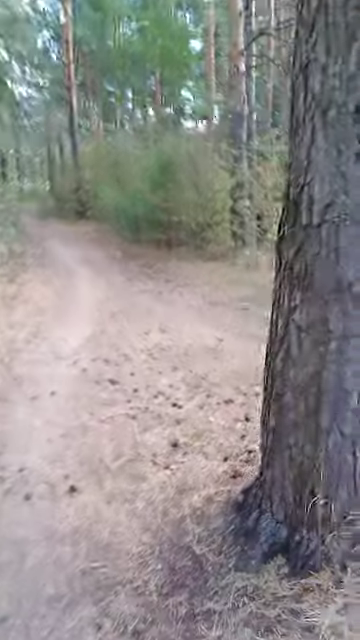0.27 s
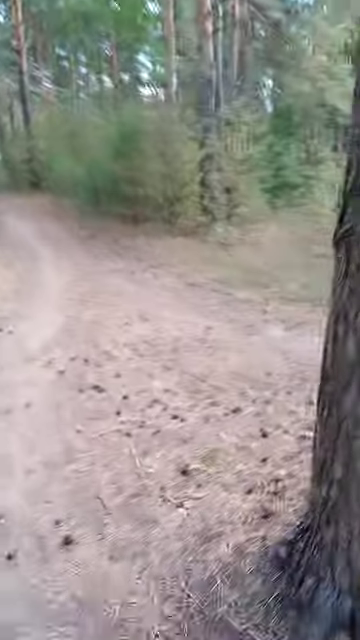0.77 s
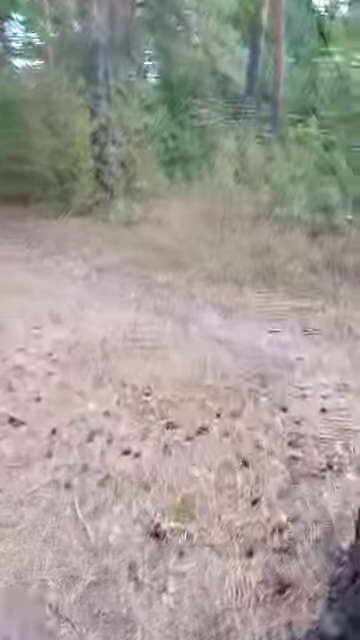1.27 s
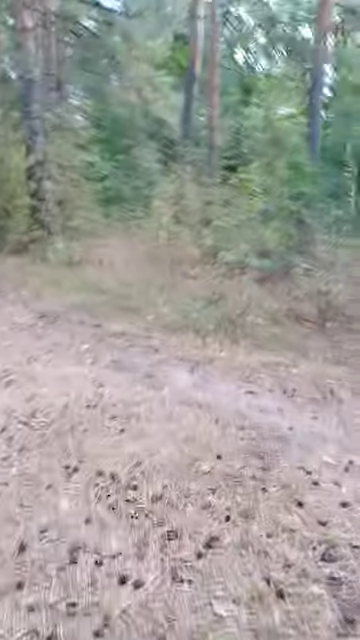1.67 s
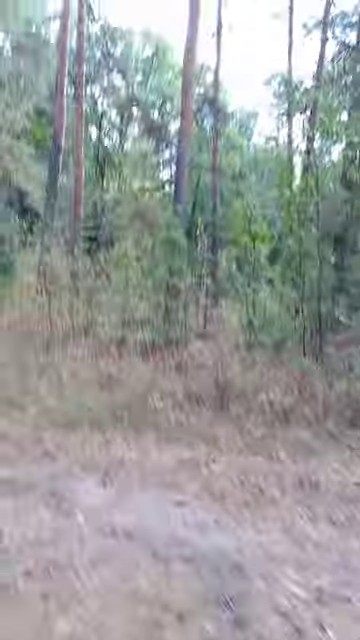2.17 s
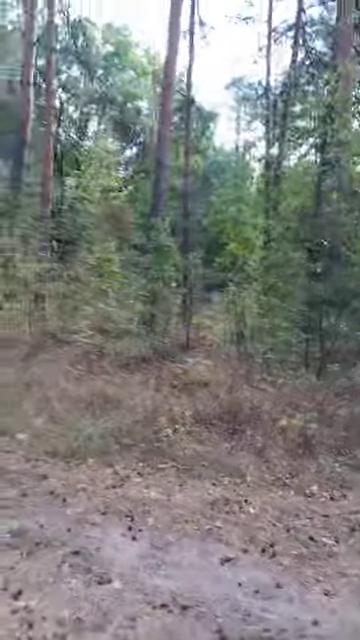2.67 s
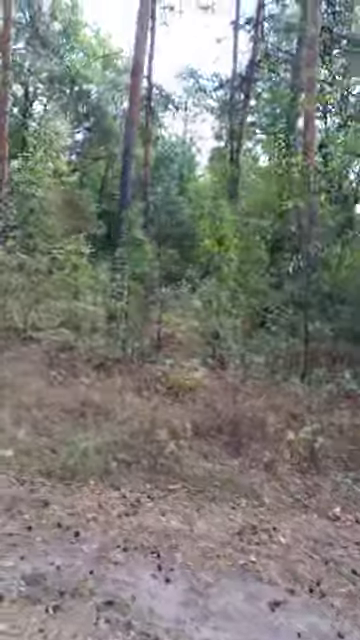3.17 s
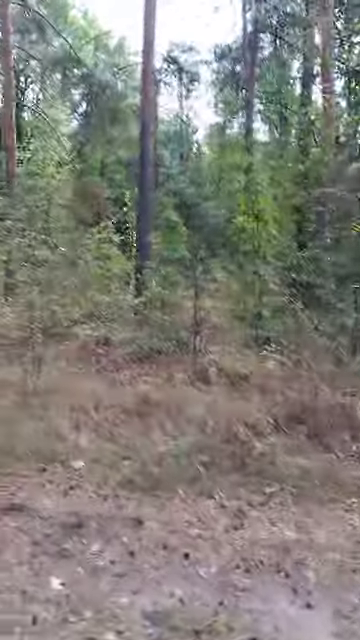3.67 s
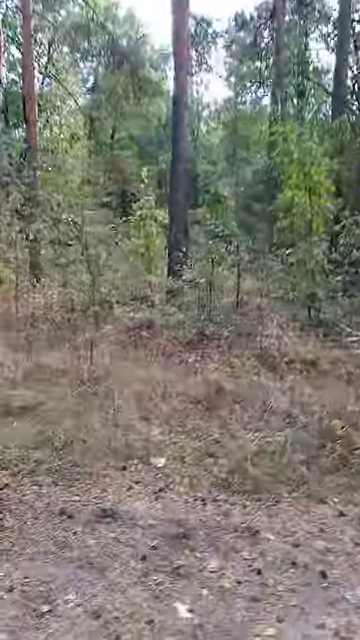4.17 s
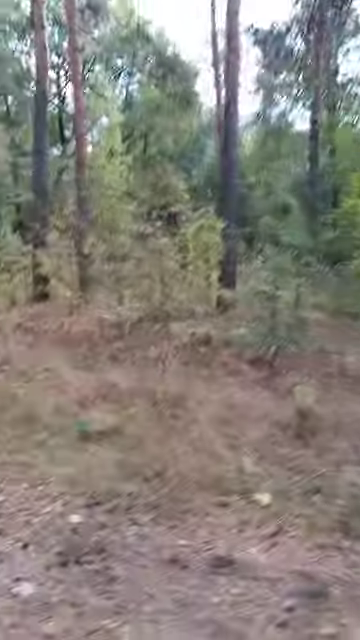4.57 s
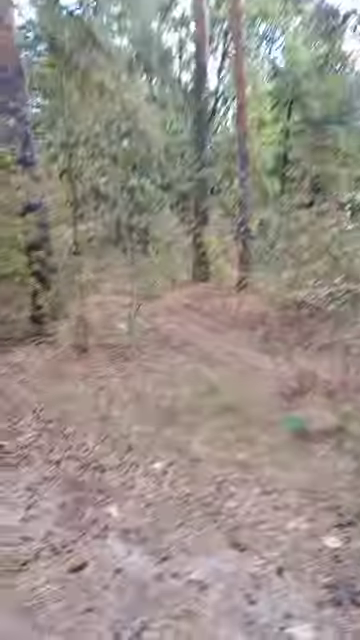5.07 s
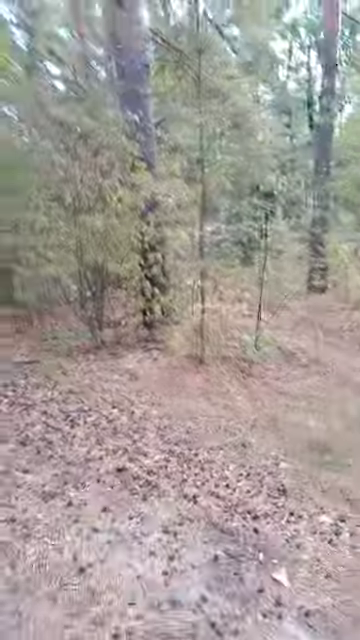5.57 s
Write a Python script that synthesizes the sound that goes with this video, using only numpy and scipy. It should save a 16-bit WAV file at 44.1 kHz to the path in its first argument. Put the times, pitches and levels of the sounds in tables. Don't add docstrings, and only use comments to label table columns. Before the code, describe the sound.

Silence until about 0.4 s, when the sound wakes with a tiny low bump. A bicycle rolls quietly along a dry forest trail: soft needle hiss, grainy crunch, low rumble and a wavering tread hum, under buffeting low wind differing left and right. Fingertip handling is far louder: small clicks from 0.44 s, then hard left-sided pops at 0.75-0.8 s. Light twig crunches come at 1.4-1.6 s, with faint regular ticking from 1.3 to 2.8 s. A thump seals the left port at 1.9 s; stronger, clipped thumps follow at 2.55 and 3.4 s, with pops around 2.59, 3.68, 4.26, 4.45, 4.57 and 4.7 s, and hollow housing knocks. Small bumps occur near 2.63 and 3.3 s. The treble cuts out briefly in lulls. A jolt and crackling cones arrive at 4.87-5.05 s, then the brightest, densest snaps at 5.45-5.8 s.

```python
import sys
import numpy as np
from scipy import signal
from scipy.io import wavfile

SR = 44100
rng = np.random.default_rng(int(sys.argv[2]) if len(sys.argv) > 2 else 0)


def amplitude_ratio(level_db):
    exponent = np.asarray(level_db, float) / 20
    return 10 ** exponent


def unload_wav(signal):
    wavfile.write(
        sys.argv[1],
        SR,
        np.round(np.clip(np.atleast_2d(signal).T, -1, 1) * 32767).astype(np.int16),
    )


N = 256662
T = np.arange(N) / SR
START_S = .3803
CUTOFF_HZ = 16550


def rms_one(x):
    return x / np.sqrt(np.mean(x ** 2) + 1e-20)


def in_time(rows):
    s, *columns = np.transpose(rows)
    return [np.interp(T, s, c) for c in columns]


def at_hz(points, hz):
    points = np.array(points)
    return np.array([np.interp(np.log(hz), np.log(points[:, 0]), c) for c in points[:, 1:].T])


def drift(rate):
    r = np.exp(-80 * np.pi * rate / SR)
    slow = signal.lfilter([1], [1, -2 * r, r * r], rng.standard_normal(N // 40 + 2002))[2000:]
    return np.interp(np.arange(N) / 40, np.arange(len(slow)), rms_one(slow))


def butter(x, hz, kind, order=2):
    return signal.sosfilt(signal.butter(order, hz, kind, fs=SR, output="sos"), x)


def ring(clicks, hz, t60):
    r, w = amplitude_ratio(-60 / (t60 * SR)), 2 * np.pi * hz / SR
    return signal.lfilter([0, np.sin(w)], [1, -2 * r * np.cos(w), r * r], clicks + 1e-18)


def opening():
    age = np.clip(T - START_S, 0, None)
    stairs = 1 - np.exp(-np.ceil(age / .01) * .35)
    offset = 0.02 * stairs + 0.0024 * (1 - np.exp(-age / 0.014))
    return offset * np.exp(-(age / 0.12) ** 4) * [[1], [.8]]


# time in seconds, gust level in dB, left over right in dB.
WIND = [(.4, -61, 10), (.55, -46, 3), (.75, -40.5, 14), (.95, -40.5, -3.5), (1.25, -36.5, -1.5),
        (1.45, -51, 8.5), (1.7, -43, 4.5), (2.25, -42, -7.5), (2.5, -44, 7.5), (2.85, -41, 2.5),
        (3.2, -47.5, -1.5), (3.36, -42.5, 13.5), (3.88, -41.5, -7), (4.2, -47, -11.5), (4.5, -39, 5),
        (4.75, -43, -5.5), (5.3, -38, -6), (5.8, -41, -17)]
DUCK_DB, DUCK_AFTER_S, DUCK_S = -12.5, 0.054, 0.09


def wind():
    gust_db, lean_db = in_time(WIND)
    for s, *_ in SEALS:
        gust_db = gust_db + DUCK_DB * np.exp(-((T - s - DUCK_AFTER_S) / DUCK_S) ** 2)
    out = []
    for level_db in (gust_db + lean_db / 2, gust_db - lean_db / 2):
        eddies = butter(rng.standard_normal(N), 5.06, "low", order=1)
        eddies = butter(butter(eddies, 65, "low"), 5.77, "high")
        lumps_db = 2.44 * drift(11)
        out.append(amplitude_ratio(level_db + 0.5 + lumps_db) * rms_one(eddies))
    return np.array(out)


# time in seconds, peak in dB.
KNOCKS = [(0.7558, -36), (0.7971, -35), (1.9042, -45), (2.2561, -55.5), (2.5552, -25.5), (2.5853, -29),
          (3.4036, -35.0), (3.684, -30), (4.2641, -42.5), (4.435, -38.5), (4.4589, -39), (4.5715, -32.5),
          (4.6934, -34)]
# time in seconds, peak in dB.
BUMPS = [
    (.598, -57),
    (2.634, -47),
    (2.645, -63),
    (2.77, -53.5),
    (3.299, -47.5),
    (4.87, -46),
    (4.952, -41.5),
]
# frequency in Hz, level in dB, t60 in seconds.
CASE = [(375.7, 1.5, 0.028), (520, -2, 0.021), (178, -16.5, 0.085)]


def knocks():
    clicks = np.zeros(N)
    for s, peak_db in [*KNOCKS, *BUMPS]:
        clicks[round(s * SR)] = amplitude_ratio(peak_db)
    modes = sum(amplitude_ratio(level_db) * ring(clicks, hz, t60) for hz, level_db, t60 in CASE)
    return butter(modes, 750, "low") * [[1.6], [1]]


# start in seconds, pressure step (full scale 1),
# settling frequency in Hz, closing time in ms.
SEALS = [
    (1.9039, -0.7, 3.55, 2.2),
    (2.5542, 1.1, 3.68, .9),
    (3.4033, 1.3, 3.7, 1.1),
]


def seals():
    out = np.zeros((2, N))
    for s, step, hz, closing in SEALS:
        age = np.clip(T - s, 0, None)
        rise = np.sin(np.pi / 2 * np.clip(age * 1000 / closing, 0, 1)) ** 2
        wobble = 1 - 0.072 * np.cos(2 * np.pi * 290 * age) * np.exp(-age / .006)
        phase = 2 * np.pi * hz * age
        leak = np.exp(-.75 * phase) * (np.cos(0.35 * phase) - 1.95 * np.sin(0.5 * phase))
        out[0] += step * rise * wobble * leak
    return out


# time in seconds, suction in dB, rebound in dB,
# pull in ms (negative: a push), crackle in dB.
FLICKS = [(0.4413, -30, -39.5, -0.19, -65), (.6477, -23, -19.5, -0.079, -46),
          (.7535, -23, -25, 0.075, -26.5), (0.7577, -7.5, -8.5, -0.018, -10),
          (0.7987, -1.5, -31.5, 0.005, -21), (2.5544, -4.5, -12.5, 0.0091, -16.5),
          (2.58577, -2, -8, 0.078, -24), (3.4037, -15, -17, .05, -22), (3.6841, -5, -4.5, -0.15, -18),
          (4.2617, 1.5, -11.5, 0.088, -26), (4.4377, -14, -9, 0.14, -11.5), (4.4596, -8.5, -37, 0.028, -27),
          (4.5713, -4.5, -3, .12, -35.5), (4.693, -12, -38, 0.073, -31)]
# time in seconds, suction in dB, rebound in dB,
# pull in ms (negative: a push), crackle in dB.
PEELS = [(0.4391, -37.5, -60, -0.99, -70), (.538, -33, -57, 0.2, -60), (.9454, -29, -34, 0.34, -67),
         (1.9034, -18.5, -25, -0.32, -4), (2.2555, -23, -26, -.0052, -33.5), (2.3061, -29, -56, 0.11, -60),
         (2.586, -1, -7.5, 0.09, -16), (3.678, -39.5, -27, 0.034, -59), (3.684, 0, -11.5, 0.167, -17),
         (3.8175, -17, -24.5, -0.011, -45), (4.2351, -25.5, -52.5, 0.62, -62),
         (4.2366, -27, -26.5, 0.14, -57), (4.4376, -5.5, -6.5, 0.15, -6), (4.46, -2.5, -10.5, 0.16, -23),
         (4.57153, 4.5, -9, 0.065, -10), (4.6939, -7, -18.5, 0.3, -24.5), (4.73, -24, -40, .12, -56),
         (4.732, -13, -16, .16, -50)]
FLICK_REBOUND_MS, PEEL_REBOUND_MS = 0.062, 0.51
# frequency in Hz, width in Hz, level in dB.
PORT = [(8030, 890, 3), (2800, 1690, -0.5), (6370, 830, -3.5), (13280, 4200, 1.5)]


def pops():
    rows = [(*row, FLICK_REBOUND_MS) for row in FLICKS] + [(*row, PEEL_REBOUND_MS) for row in PEELS]
    rows = sorted(rows, key=lambda row: round(row[0], 3))
    pressure, crackle = np.zeros(N), np.zeros(N)
    noise = rng.standard_normal((len(rows), 500))
    ms = (np.arange(500) - 150) / SR * 1000
    for (s, suction_db, rebound_db, pull, crackle_db, rebound), tear in zip(rows, noise):
        at = slice(round(s * SR) - 150, round(s * SR) + 350)
        slope = np.where(ms < 0, ms / 1.4, ms / .5) / max(abs(pull), .03)
        tip = 2.5 * abs(pull)
        dip = np.exp(tip - np.sqrt(slope ** 2 + tip ** 2))
        age = np.clip((ms - .5 * abs(pull)) / max(rebound, .04), 0, None)
        swing_back = age * np.exp(1 - age)
        pressure[at] += np.sign(pull) * (amplitude_ratio(rebound_db) * swing_back - amplitude_ratio(suction_db) * dip)
        tear = tear * (abs(ms + .12 - .7 * rebound) < max(.7 * rebound, .1))
        crackle[at] += amplitude_ratio(crackle_db) * tear / np.abs(tear).max()
    crackle = sum(amplitude_ratio(level_db + 10.0) * butter(crackle, [hz - width / 2, hz + width / 2], "band", order=1)
                  for hz, width, level_db in PORT)
    pressure = pressure + 2.78 * butter(pressure, [7400, 8800], "band", order=1)
    pressure = pressure + 0.29 * butter(pressure, [1700, 3000], "band", order=1)
    left = butter(pressure, 52, "high", order=1) + crackle
    left = butter(left, 8300, "low")
    left = left - 0.65 * butter(left, [9800, 13500], "band", order=1)
    across = butter(crackle + .6 * pressure, 1500, "high")
    across = across + 3.4 * butter(across, [8000, 9800], "band", order=1)
    return np.array([left, amplitude_ratio(-36.5) * np.roll(across, 6)])


# shuts in seconds, opens in seconds, depth in dB.
GATE = [(0.815, 0.868, -20), (0.914, 0.947, -15), (1.315, 1.359, -17), (1.988, 2.009, -11),
        (2.041, 2.078, -14), (2.418, 2.543, -23.5), (2.727, 2.823, -17.5), (3.032, 3.161, -18.5),
        (3.202, 3.244, -14.5), (3.288, 3.309, -18), (3.311, 3.351, -12), (3.409, 3.426, -18),
        (3.484, 3.592, -20), (3.655, 3.671, -8), (3.687, 3.736, -32), (3.855, 3.88, -19),
        (4.165, 4.199, -17.5), (4.658, 4.698, -24), (5.262, 5.365, -23.5)]
# time in seconds, lift in dB.
BLINKS = [
    (2.472, 13.5),
    (2.49, 11),
    (2.781, 12),
    (3.094, 16),
    (3.121, 3),
    (3.539, 17),
    (3.571, 10.2),
    (5.312, 8),
]
GATE_HZ = 815


def gate():
    gain_db = -22 * np.exp(-(np.clip(T - START_S, 0, None) / 0.099) ** 2)
    for shuts, opens, depth_db in GATE:
        corners = [shuts - .004, shuts + 0.0036, opens - .008, opens + 0.0091]
        gain_db += np.interp(T, corners, [0, depth_db, depth_db, 0])
    for s, lift_db in BLINKS:
        gain_db += lift_db * np.exp(-((T - s) / 0.0085) ** 2)
    return amplitude_ratio(gain_db)


LULL_HISS, LULL_ROUGH, LULL_SPREAD_S = 0.19, 0.049, 0.063


def lulls():
    dips_db = np.zeros(N)
    for shuts, opens, depth_db in GATE:
        middle, spread = (shuts + opens) / 2, (opens - shuts) / 2 + LULL_SPREAD_S
        dips_db += depth_db * np.exp(-((T - middle) / spread) ** 2)
    return dips_db


# time in seconds, frequency in Hz, level in dB, t60 in seconds.
PINGS = [
    (.497, 6870, -49, 0.018),
    (0.503, 7130, -51, 0.012),
    (1.622, 3080, -55, 0.076),
    (1.622, 9480, -52, 0.046),
    (4.105, 2740, -60, 0.056),
    (4.999, 3000, -55, 0.024),
    (5.648, 5730, -44, .018),
    (5.728, 5600, -44, 0.026),
]


def pings():
    out = np.zeros(N)
    for s, hz, level_db, t60 in PINGS:
        taps = np.zeros(N)
        taps[round(s * SR) + np.array([0, round(6 * SR / hz)])] = .6
        out += amplitude_ratio(level_db) * ring(taps, hz, t60)
    return out * [[1.5], [1]]


def grains(per_s, spread_db):
    shape = (2, 3, N)
    sizes = amplitude_ratio(spread_db * np.minimum(rng.exponential(1, shape), 4)) * rng.choice([-1, 1], shape)
    return sizes * (rng.random(shape) < per_s / SR) + 1e-18


# frequency in Hz, shared part of the power from 0 to 1.
LIKENESS = [(100, 0.98), (200, .8), (900, 0.6), (1400, 0.8), (2500, 0.16), (4000, 0.1)]
RIGHT_LAG = 20


def coloured(white, spectrum, patchy_db, rate):
    out, together = 0, drift(rate / 2)
    lowest, highest = spectrum[0][0], spectrum[-1][0]
    edges = lowest * 2 ** np.arange(-.2, np.log2(highest / lowest) + .2, .4)
    for k, (low, high) in enumerate(zip(edges, edges[1:])):
        middle = np.sqrt(low * high)
        shared, left, right = butter(white[k % 2], [low, high], "band")
        alike = np.clip(at_hz(LIKENESS, middle)[0], 0, 1)
        common = np.array([shared, np.roll(shared, RIGHT_LAG)])
        pair = np.sqrt(alike) * common + np.sqrt(1 - alike) * np.array([left, right])
        flicker_db = patchy_db * (together + drift(rate))
        out = out + amplitude_ratio(at_hz(spectrum, middle)[:, None] + flicker_db) * pair
    return out / np.sqrt(np.mean(out[1] ** 2))


# time in seconds, needle litter in dB, roughness in dB.
GROUND = [(.38, -65.5, -68), (.65, -61, -58.5), (.95, -69, -58), (1.22, -58, -60), (1.45, -66, -60),
          (1.65, -63, -56.5), (2.05, -70.5, -56), (2.25, -62, -57), (2.65, -62.5, -62), (3.0, -68, -58),
          (3.3, -64.5, -60.5), (3.8, -65.5, -56), (4.1, -63.5, -60.5), (4.45, -62, -55.5),
          (4.7, -63.5, -54), (5.0, -65, -48), (5.3, -61.5, -57), (5.6, -62, -50.5)]
# start in seconds, peak in dB, thud relative to it in dB, length in seconds.
CRUSH = [(0.493, -77, -17, 0.0044), (0.589, -52.5, 8, 0.0062), (1.417, -49, -10, 0.0083),
         (1.518, -44, -8, 0.0098), (1.584, -55, 13, 0.0054), (1.617, -44.5, -3.5, 0.019),
         (2.632, -55.5, 23, 0.008), (2.773, -63.5, 15.5, 0.012), (3.302, -42.5, 0.5, 0.0066),
         (4.077, -45.5, -5, 0.018), (4.183, -60, 21, 0.016), (4.286, -46, -20, 0.005),
         (4.6065, -46, 9.5, 0.0092), (4.862, -45, -4, 0.0048), (4.873, -51, 9, 0.005),
         (4.893, -52, 8, 0.0077), (4.949, -35.5, -10, 0.0052), (4.974, -35, -17, 0.0054),
         (4.987, -41.5, 3, 0.011), (5.014, -47.5, -2, .007), (5.039, -49.5, -1, 0.011),
         (5.14, -57, 3, 0.0027), (5.223, -61.5, 21, 0.0073), (5.445, -39, -6, 0.0042),
         (5.571, -39, -33, 0.012), (5.6046, -29, 2, 0.0054), (5.632, -35, 7.5, 0.0085),
         (5.6627, -32.5, -28, 0.0043), (5.7223, -37, 5, 0.003), (5.78, -46, -11, 0.0045)]
# time in seconds, level in dB.
DRONE = [(.38, -72), (.85, -70), (1.1, -60), (1.5, -63.5), (2.1, -53), (2.6, -54), (2.85, -61.5),
         (3.1, -55), (3.7, -56.5), (4.35, -53), (5.05, -71), (5.6, -53)]
# first tick in seconds, last in seconds, period in seconds, lift of the hiss in dB.
TICKING = (1.3, 2.8, 0.052, 6.1)
# frequency in Hz, left in dB per Hz, right in dB per Hz.
HISS = [(501, 3, -5.5), (925, -1, -5), (1730, 2.5, -4.5), (3000, 6, -3), (4500, 0, -3.5), (6570, 0.5, -8),
        (7700, 1.5, -5), (9300, -2.5, -6), (9720, -20.5, -12.5), (12500, -15.5, -23), (16300, -8, -20.5)]
# frequency in Hz, left in dB per Hz, right in dB per Hz.
CRUNCH = [(599, -0.5, -1.5), (1320, 1, -2.5), (1870, 4, 2.5), (2140, 2, -1), (3250, 2, 0), (4800, -12, -9),
          (6450, 4, -5), (7200, -4.5, -20.5), (10900, -40, -19.5)]
# frequency in Hz, left in dB per Hz, right in dB per Hz.
RUMBLE = [(91.8, 3, 7.5), (142.5, 3, 0.5), (250, 4, 3.5), (407, 3.5, 0.5), (720, -10, -8), (930, -7.5, -16),
          (2000, -26, -35.5), (8600, -35, -38.5), (12000, -45.5, -57.5)]
CRUNCH_DB, CRUNCH_PER_LITTER = -12.5, -0.33


def tyres():
    litter_db, rough_db = in_time(GROUND)
    lull_db = lulls()
    hiss_db = litter_db + LULL_HISS * lull_db
    rough_db = rough_db + LULL_ROUGH * lull_db
    cushion_db = CRUNCH_PER_LITTER * (litter_db - litter_db.mean())
    crunch_gain = amplitude_ratio(rough_db + CRUNCH_DB + cushion_db)
    rumble_gain = amplitude_ratio(rough_db - 3.5)
    for s, peak_db, thud_db, length in CRUSH:
        at = slice(int(s * SR), int((s + .2) * SR))
        age = np.clip((T[at] - s) / max(length, .002), 0, None)
        swell = age * np.exp(1 - age)
        crunch_gain[at] += amplitude_ratio(peak_db - 10.5) * swell
        rumble_gain[at] += amplitude_ratio(peak_db + thud_db - 11.0) * swell

    first, last, period, lift_db = TICKING
    off_beat = (T - first + period / 2) % period - period / 2
    ticking = (T > first - period / 2) * (T < last)
    hiss_db = hiss_db + lift_db * np.exp(-(off_beat / 0.0034) ** 2) * ticking

    hiss = coloured(rng.standard_normal((2, 3, N)), HISS, patchy_db=1.54, rate=17)
    hiss[1] += 1.9 * butter(hiss[1], [8800, 10100], "band", order=1)
    hiss += amplitude_ratio(-38 + 3.0 * drift(8)) * np.sin(2 * np.pi * 14000 * T) * [[.3], [1]]
    crunch = crunch_gain * coloured(grains(per_s=5000., spread_db=5.5), CRUNCH, patchy_db=2.5, rate=26)
    rumble = rumble_gain * coloured(rng.standard_normal((2, 3, N)), RUMBLE, patchy_db=2.5, rate=17)
    hum = rms_one(butter(rng.standard_normal(N), [128, 180], "band"))
    drone = amplitude_ratio(in_time(DRONE)[0] - 2.5) * hum
    return amplitude_ratio(hiss_db) * hiss + crunch + pings(), rumble + drone


def scene():
    bright, rumble = tyres()
    dull = butter(bright, GATE_HZ, "low", order=4)
    treble = signal.sosfilt(signal.cheby2(10, 50, CUTOFF_HZ, fs=SR, output="sos"), bright)
    gated = gate() * butter(treble, GATE_HZ, "high", order=4)
    mix = gated + dull + rumble + wind() + pops() + knocks() + seals() + opening()
    return mix * (T > START_S)


def top_cut(x):
    return signal.sosfilt(signal.butter(12, 16560, fs=SR, output="sos"), x)


def record(dry):
    x = signal.sosfilt(signal.cheby2(10, 60, CUTOFF_HZ + 150, fs=SR, output="sos"), dry)
    mix = np.clip(x, -.99, .99)
    return top_cut(mix)


dry = scene()
out = record(dry)
unload_wav(out)
```